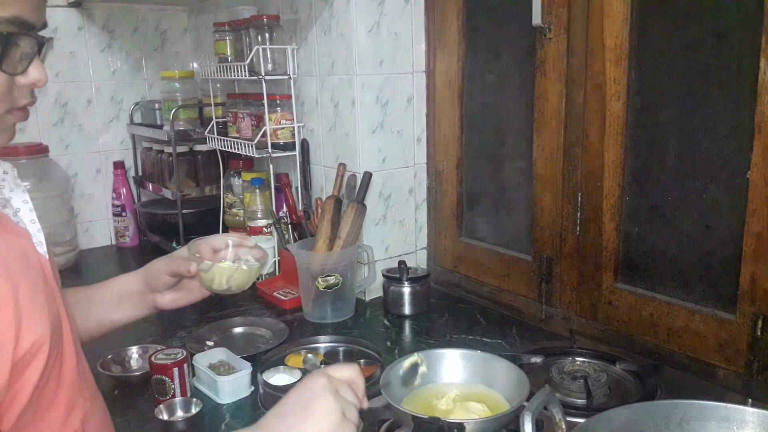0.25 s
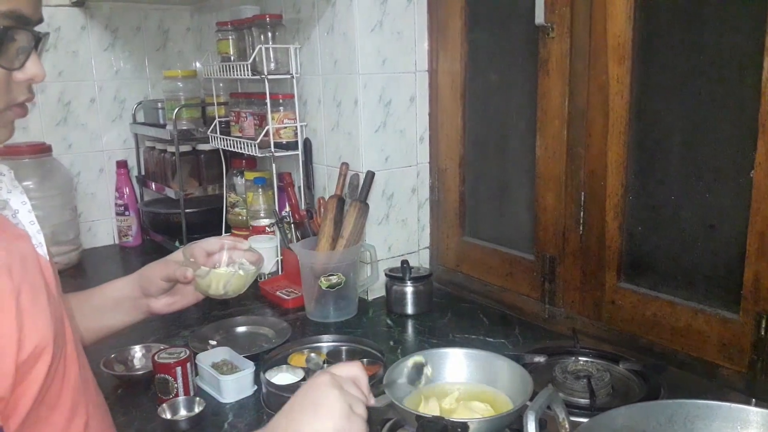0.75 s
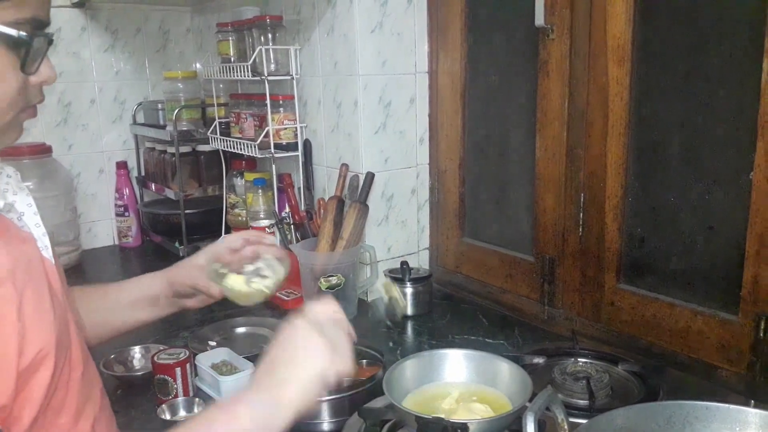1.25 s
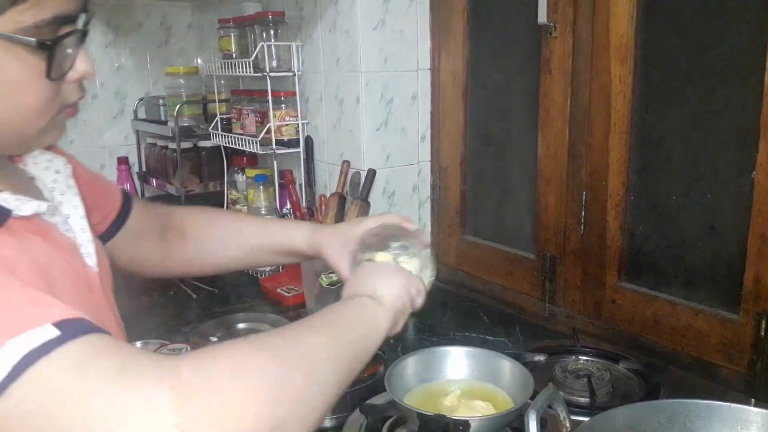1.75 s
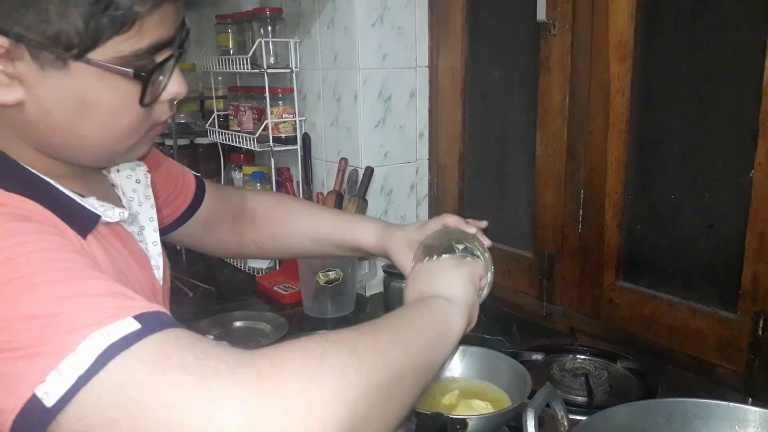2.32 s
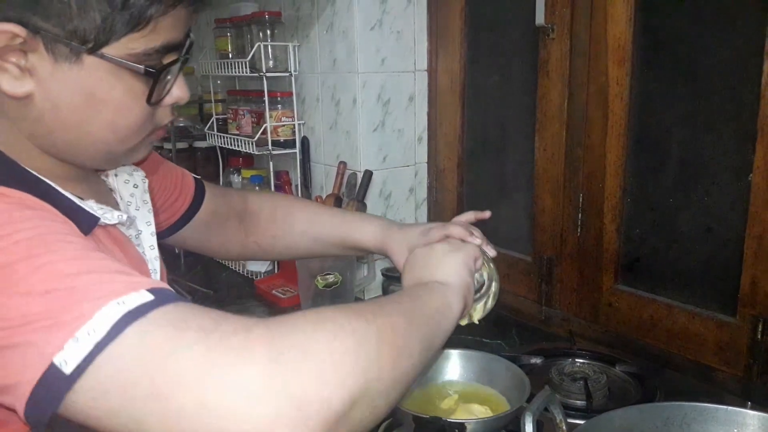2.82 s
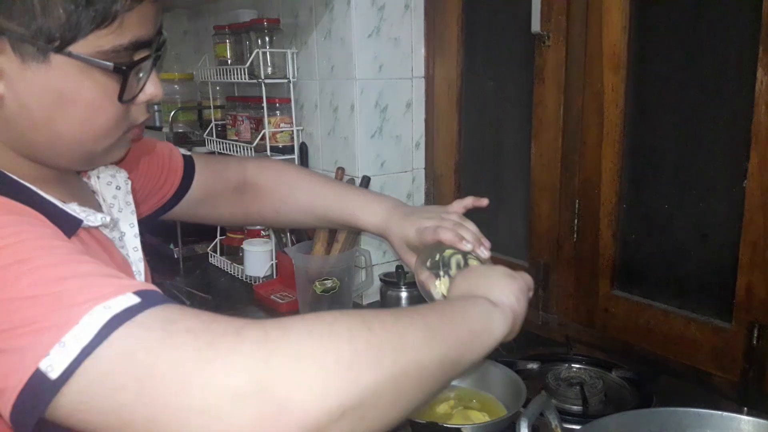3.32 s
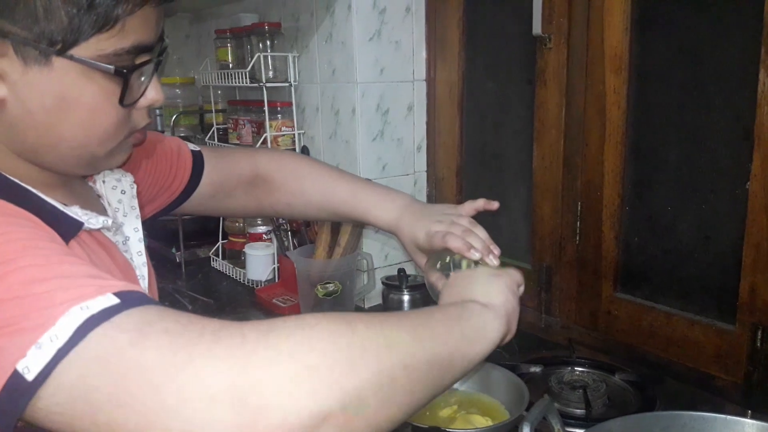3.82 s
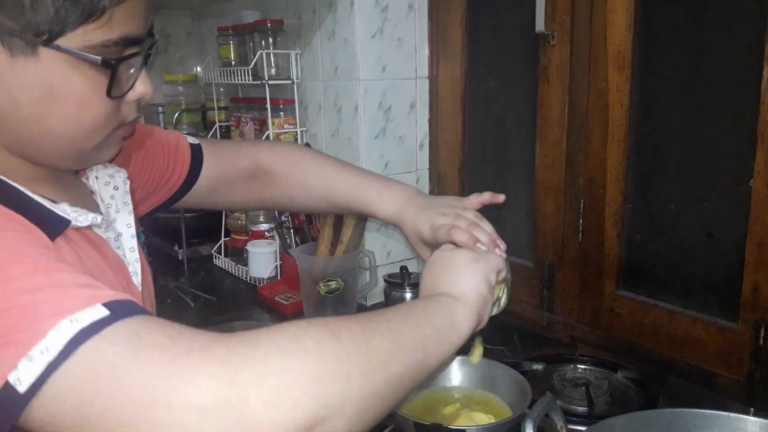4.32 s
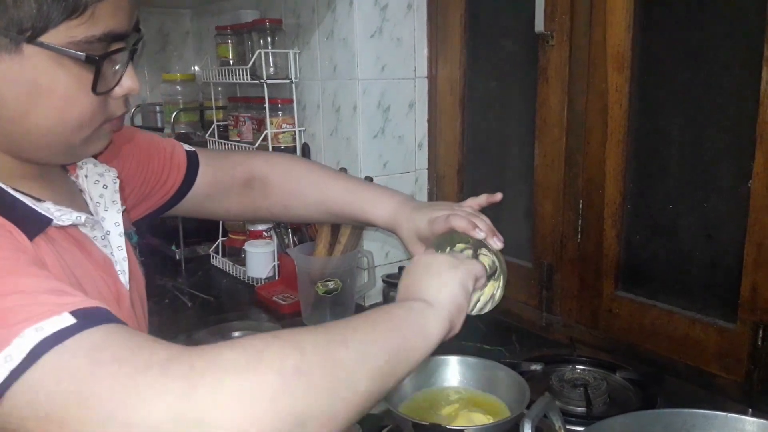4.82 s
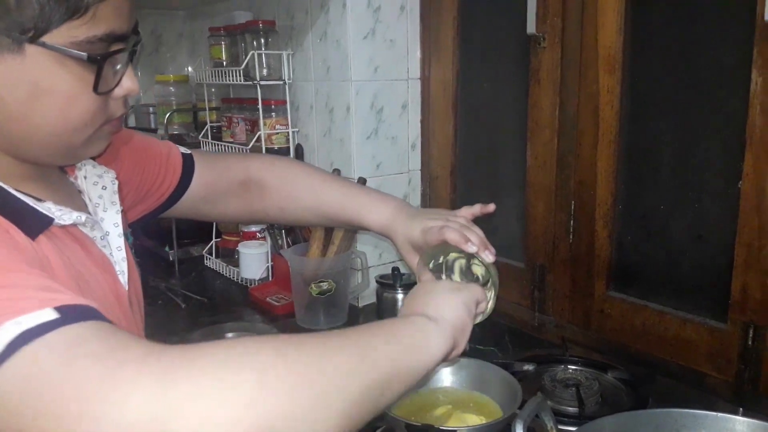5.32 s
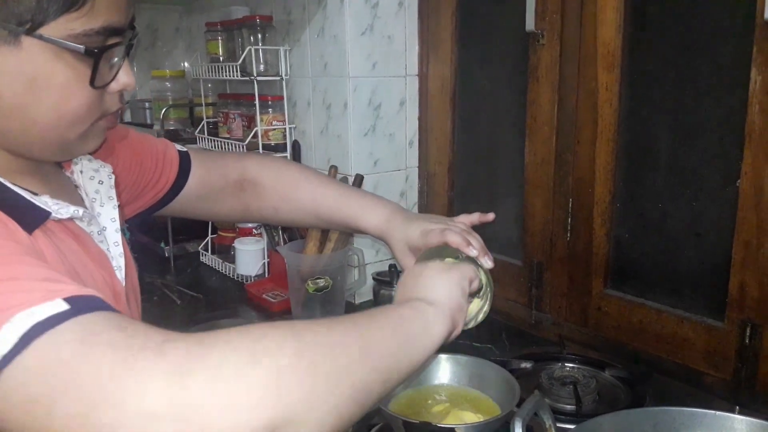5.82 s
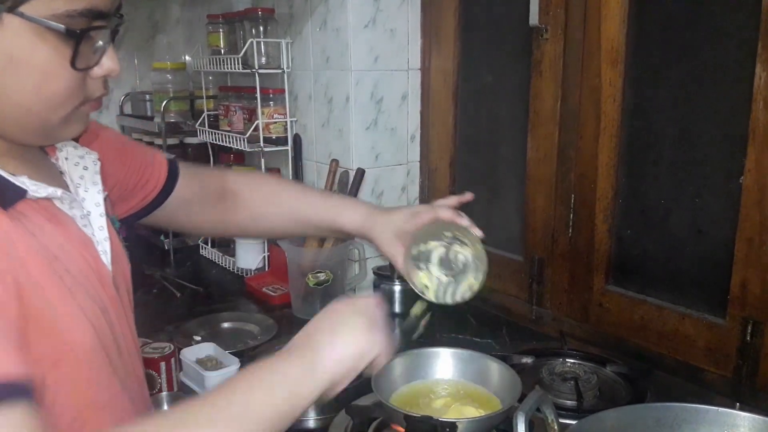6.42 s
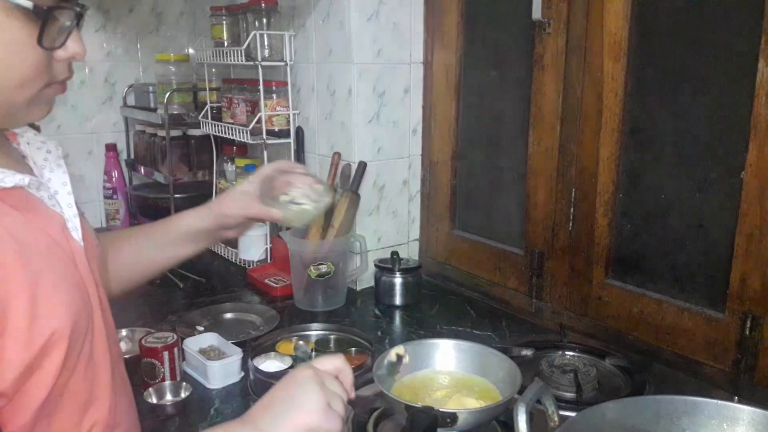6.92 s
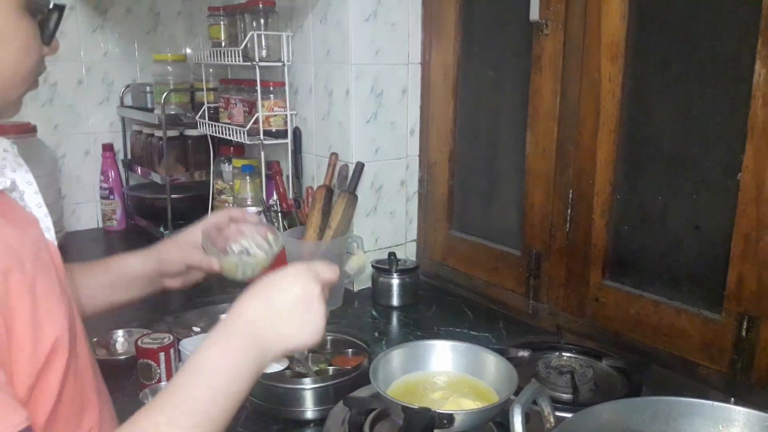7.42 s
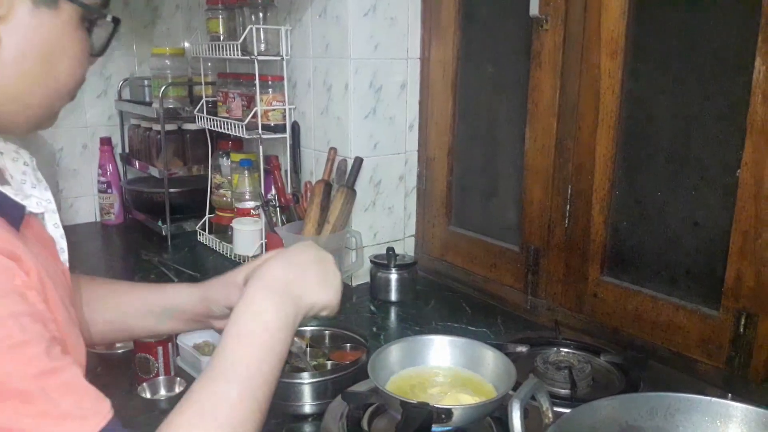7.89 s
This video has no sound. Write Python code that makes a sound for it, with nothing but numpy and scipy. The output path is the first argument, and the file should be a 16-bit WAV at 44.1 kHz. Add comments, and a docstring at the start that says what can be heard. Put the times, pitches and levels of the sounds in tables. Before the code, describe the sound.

Hot butter hisses and spits over a softly rumbling burner, as a spoon knocks on the pan and clacks against a glass bowl.

```python
"""Butter sizzles in a metal pan over a rumbling gas flame, in a small tiled kitchen.
Steam bubbles burst in the hot fat; larger water drops spit. A spoon raps the pan's rim, ringing
wall and bottom, clacks and clinks in a glass bowl as it scoops more butter, then raps the pan again.
A nearby phone hears it in mono; its limiter ducks the frying under the sharpest blows."""
import sys
import numpy as np
from scipy import signal
from scipy.fft import rfft, irfft
from scipy.io import wavfile
from scipy.ndimage import uniform_filter1d, minimum_filter1d

SR = 44100
rng = np.random.default_rng(int(sys.argv[2]) if len(sys.argv) > 2 else 0)


def transcribe(signal):
    """Save signal, clipped to [-1, 1], as a 16-bit WAV file at the path in sys.argv[1]."""
    frames = np.atleast_2d(signal).T
    limited = np.clip(frames, -1, 1)
    pcm = np.round(limited * 32767).astype(np.int16)
    wavfile.write(sys.argv[1], SR, pcm)


N = 359415
TIME_S = np.arange(N) / SR
AGE_S = np.arange(int(0.6 * SR)) / SR  # time since a contact

# spectrum of bubbles bursting in fat: f/Hz, level/dB
SIZZLE_SPECTRUM = [(500, -33.5), (1300, -24.5), (1850, -17.5), (2300, -13), (2750, -15), (3300, -5),
                   (3850, -5.5), (4300, 1), (5100, 2), (5400, -3.5), (5700, -3), (7000, -18.5),
                   (8300, -27.5), (11000, -22)]
# spectrum of the finest foam: f/Hz, level/dB
FIZZ_SPECTRUM = [(6000, -61), (8500, -29.5), (9600, -11), (10600, -2), (11700, 0.5), (12700, 0),
                 (14000, 2.5), (15500, 2)]


def undb(db):
    """Decibels to gain."""
    return 10 ** (np.asarray(db) / 20)


def unit(x):
    """Scale to rms 1."""
    return x / np.sqrt(np.mean(x ** 2) + 1e-18)


def add(out, t_s, sound):
    """Mix a sound in at t_s."""
    i = max(int(t_s * SR), 0)
    out[i:i + len(sound)] += sound[:max(N - i, 0)]


def wander(rate_hz):
    """Smooth random drift, rms 1."""
    hold = max(int(SR / rate_hz), 1)
    steps = np.repeat(rng.standard_normal(N // hold + 1), hold)
    return unit(uniform_filter1d(steps, hold)[:N])


def burst(t60_s):
    """Exponentially decaying noise."""
    return rng.standard_normal(len(AGE_S)) * np.exp(-np.log(1000) * AGE_S / t60_s)


def colour(x, spectrum, size=4096):
    """Minimum-phase filter through (f/Hz, level/dB) points."""
    hz, db = np.transpose(spectrum)
    bins_hz = np.maximum(np.fft.rfftfreq(size, 1 / SR), 1)
    gain = undb(np.interp(np.log(bins_hz), np.log(hz), db))
    cepstrum = irfft(np.log(gain))
    cepstrum[1:size // 2] *= 2
    cepstrum[size // 2 + 1:] = 0
    return signal.fftconvolve(x, irfft(np.exp(rfft(cepstrum))))[:len(x)]


def resonate(x, hz, width_hz):
    """One damped resonance."""
    return signal.lfilter(*signal.iirpeak(hz, hz / width_hz, fs=SR), x)


def kitchen(x, wet_db, t60_s=0.39, build_s=0.0021):
    """Direct sound plus dense echoes off the tiles, different for each spot."""
    tail = burst(t60_s) * (1 - np.exp(-AGE_S / build_s))
    response = undb(wet_db) * tail / np.linalg.norm(tail)
    response[0] += 1
    return signal.fftconvolve(x, response)[:len(x)]


def in_room(x, rms_db, wet_db):
    """One part of a blow with its echoes, set to rms_db over the first 60 ms."""
    y = kitchen(x, wet_db)
    return y * undb(rms_db) / np.sqrt(np.mean(y[:int(0.06 * SR)] ** 2))


def ring(modes, drive_db, chatter_t60_s, wet_db):
    """Contact chatter excites each mode; ringing and echoes blur together."""
    hz, width_hz, mode_db = np.transpose(modes)
    chatter = burst(chatter_t60_s)
    return sum(in_room(resonate(resonate(chatter, f, width), f, 3 * width), db, wet_db)
               for f, width, db in zip(hz, width_hz, drive_db + mode_db))


def stove_db():
    """Reference level for fat and flame, per sample."""
    # stove loudness: t/s, level/dB
    levels = [(0.0, -20), (0.61, -20.5), (1.16, -21), (2.06, -21.5), (2.5, -20.5), (2.61, -22), (3.29, -26),
              (3.52, -24.5), (4.22, -22.5), (4.88, -23), (4.99, -26), (5.31, -27), (5.7, -28), (6.6, -27.5),
              (7.15, -22.5), (8.15, -21.5)]
    return np.interp(TIME_S, *np.transpose(levels))


def bubble_pops(per_s, spread_db):
    """Steam bubbles burst at random: many small, a few large."""
    happens = rng.random(N) < per_s / SR
    size = undb(spread_db * np.minimum(rng.exponential(size=N), 4.8))
    return unit(happens * size * rng.choice([-1, 1], N))


def boil_off(x, offset_db, db_per_s):
    """One band of the frying follows the stove's level and drifts as the butter's water boils off."""
    return unit(x) * undb(stove_db() + offset_db + db_per_s * TIME_S)


def frying(split_hz=4450):
    """Bubbles surge in the fat: the same pops crackle low and sizzle high, and the finest foam fizzes."""
    bubbles = bubble_pops(per_s=4200, spread_db=2.0)
    foam = bubble_pops(per_s=15000, spread_db=3.5)
    surge_db = 0.85 * wander(rate_hz=26)
    fat = kitchen(colour(bubbles, SIZZLE_SPECTRUM), wet_db=-8.5)
    crackle = signal.sosfiltfilt(signal.butter(6, split_hz, fs=SR, output="sos"), fat)
    sizzle = fat - crackle
    fizz = colour(foam + undb(-5) * bubbles, FIZZ_SPECTRUM)
    return undb(surge_db) * (boil_off(crackle, offset_db=-7, db_per_s=-0.27)
                             + boil_off(sizzle, offset_db=-4.5, db_per_s=0.083)
                             + boil_off(fizz, offset_db=-2.27, db_per_s=-0.14))


def flame(offset_db=-25.5, flutter_db=0.8):
    """The gas burner's soft, fluttering rumble."""
    # burner spectrum: f/Hz, level/dB
    spectrum = [(25, -33), (48, -53), (62, -9), (84, -7), (100, -13), (125, -3), (160, -0.5), (210, 0),
                (310, -5.5), (450, -5.5), (650, -13.5), (1200, -10.5), (3000, -32)]
    rumble = unit(colour(rng.standard_normal(N), spectrum))
    return rumble * undb(stove_db() + offset_db + flutter_db * wander(rate_hz=8.1))


def spits():
    """Larger water drops burst in the fat and crack through the sizzle."""
    # bursting drops: t/s, peak before echoes/dB
    drops = [(.089, -6), (1.939, -6.5), (2.153, -6), (2.951, -8), (4.212, -3.5), (4.832, -6), (5.856, -17),
             (6.856, -8), (7.084, -7), (7.22, -4)]
    out = np.zeros(N)
    for t_s, peak_db in drops:
        pop = burst(t60_s=0.0061)
        crack = unit(colour(pop, SIZZLE_SPECTRUM)) + undb(-5.5) * unit(colour(pop, FIZZ_SPECTRUM))
        add(out, t_s, kitchen(crack / np.abs(crack).max(), wet_db=-4) * undb(peak_db))
    return out


def spoon_on_pan(rock_s=0.042, rock_rap_db=-7.5, rock_rim_db=-3):
    """A rap rings rim and fat-damped bottom; the pan rocks back on its support with a softer blow."""
    # blows on the rim: t/s, rap/dB, bottom/dB, rim/dB
    hits = [(0.115, -32, -42, -58), (0.351, -17, -25.5, -41), (0.526, -19, -26.5, -41.5),
            (0.699, -18, -31, -41), (0.875, -18.5, -34.5, -45), (1.047, -17, -31, -40),
            (6.661, -27.5, -41, -46), (6.88, -30, -46, -48), (7.01, -17, -28, -37), (7.545, -37, -55, -62)]
    # spectrum of a rap: f/Hz, level/dB
    rap_spectrum = [(40, -49), (110, -34), (200, -8), (340, -13), (450, -7), (700, -11), (1250, -11.5),
                    (1600, -10), (2150, -6), (2650, -6.5), (3300, -1), (4550, 5), (5400, -2.5), (7500, -20),
                    (10000, -33)]
    # pan bottom modes: f/Hz, width/Hz, level/dB
    bottom_modes = [(217, 18, -24), (286, 9.8, -22), (408, 22, -18), (519, 19.4, -3.5), (736, 89, -17),
                    (815, 31, -26)]
    # pan rim modes: f/Hz, width/Hz, level/dB
    rim_modes = [(1072, 16, -6), (1248, 18, -6), (1818, 44, 6), (2120, 62, 5.5), (2950, 120, 1),
                 (3600, 50, -34)]
    out = np.zeros(N)
    for t_s, rap_db, bottom_db, rim_db in hits:
        rebound_s = t_s + rock_s * rng.uniform(0.7, 1.15)
        rap = colour(burst(t60_s=0.043), rap_spectrum)
        add(out, t_s, in_room(rap, rap_db, wet_db=2))
        add(out, t_s, ring(bottom_modes, bottom_db, chatter_t60_s=0.043, wet_db=-4))
        add(out, t_s, ring(rim_modes, rim_db, chatter_t60_s=0.072, wet_db=1))
        rebound = colour(burst(t60_s=0.095), rap_spectrum)
        add(out, rebound_s, in_room(rebound, rap_db + rock_rap_db, wet_db=4))
        add(out, rebound_s, ring(rim_modes, rim_db + rock_rim_db, chatter_t60_s=0.033, wet_db=-3.5))
    return out


def spoon_on_bowl(nominal_ring_hz=5570, overtones_above_hz=7000, edge_share=0.19):
    """The spoon clacks on hand-held glass, which knocks hollowly and rings when struck cleanly."""
    # blows on the bowl: t/s, clack/dB, knock/dB, knock/Hz, ring/dB, ring/Hz, edge tick/dB
    hits = [(1.646, -19.5, -31, 1640, -24.5, 5500, -29), (1.729, -28, -29, 1470, -27, 5180, -38),
            (2.138, -29, -32, 1450, -44, 5700, -35), (2.186, -22, -30, 1590, -40, 5500, -45),
            (2.517, -29, -32, 1510, -33, 5440, -27.5), (2.568, -10.5, -26.5, 1640, -27, 5360, -45),
            (2.857, -36, -39, 1510, -43, 5670, -31.5), (2.904, -15.5, -30, 1580, -48, 5460, -33),
            (3.254, -19.5, -38, 1590, -37, 5540, -34), (3.605, -27, -32, 1670, -25, 5590, -33),
            (3.957, -38, -29.5, 1850, -20, 5630, -24.5), (4.347, -27, -39, 1510, -42, 5460, -24.5),
            (4.444, -14.5, -32.5, 1700, -44, 5540, -29), (4.897, -9, -27, 1760, -10.5, 5560, -26),
            (5.175, -30, -37.5, 1520, -39, 5660, -23.5), (5.236, -21, -35.5, 1470, -35, 5680, -33),
            (5.566, -18, -37, 1710, -16, 5703, -19.5), (5.944, -32.5, -40.5, 1480, -39, 5400, -32),
            (5.998, -21, -33.5, 1700, -33, 5510, -30.5), (6.122, -32, -41, 1700, -36, 5740, -40),
            (7.797, -23, -25, 1520, -29, 5570, -27), (8.12, -27, -45, 1890, -27.5, 5620, -29)]
    # glass bowl modes: f/Hz, width/Hz, level/dB
    glass_modes = [(1683, 84, -17), (3433, 67, -8.5), (4340, 360, -8.5), (5240, 190, -7.5), (5577, 76, 2.5),
                   (5855, 400, -7), (8030, 160, -12.5), (11200, 350, -4)]
    # spectrum of a clack: f/Hz, level/dB
    clack_spectrum = [(60, -34), (550, -25), (800, -22), (1700, -15), (2700, -15), (3280, -2), (3600, 0),
                      (3850, 1.5), (4300, -1), (4900, 2.5), (5700, -4), (7000, -21), (8800, -36.5),
                      (15000, -10)]
    # spectrum of an edge tick: f/Hz, level/dB
    tick_spectrum = [(7000, -50), (9300, -12), (10600, 5), (11600, 13), (12600, 1), (14000, -6),
                     (15300, -5)]
    out = np.zeros(N)
    for t_s, clack_db, knock_db, knock_hz, ring_db, ring_hz, tick_db in hits:
        knock = resonate(burst(t60_s=0.035), knock_hz, width_hz=380)
        knock = resonate(knock, knock_hz, width_hz=1340)
        # grip and contact point shift the ring; a sharp edge brings out the high overtones
        modes = np.array(glass_modes) * [ring_hz / nominal_ring_hz, 1, 1]
        overtone_db = ring_db + edge_share * (tick_db - ring_db) - 6.5
        drive_db = np.where(modes[:, 0] > overtones_above_hz, overtone_db, ring_db)
        add(out, t_s, in_room(colour(burst(t60_s=0.03), clack_spectrum), clack_db, wet_db=-2.5))
        add(out, t_s, in_room(knock, knock_db, wet_db=2))
        add(out, t_s, in_room(colour(burst(t60_s=0.054), tick_spectrum), tick_db, wet_db=-6.5))
        add(out, t_s, ring(modes, drive_db, chatter_t60_s=0.042, wet_db=-6))
    return out


def scene():
    """Stove and spoon, the same in both channels."""
    mono = frying() + spits() + flame() + spoon_on_bowl() + spoon_on_pan()
    return np.array([mono, mono])


def record(dry):
    """A look-ahead limiter ducks around peaks; clipping and a low-pass follow."""
    ceiling, ahead_s, release_s, top_hz = 1.25, 0.012, 0.045, 15800
    needed_gain = np.minimum(1, ceiling / (np.abs(dry).max(axis=0) + 1e-9))
    ahead = int(ahead_s * SR)
    cut = 1 - uniform_filter1d(minimum_filter1d(needed_gain, 2 * ahead + 1), ahead)
    pole = np.exp(-1 / (release_s * SR))
    gain = 1 - np.maximum(cut, signal.lfilter([1 - pole], [1, -pole], cut))
    low_pass = signal.ellip(12, 0.2, 70, top_hz, fs=SR, output="sos")
    return signal.sosfilt(low_pass, np.clip(dry * gain, -0.95, 0.95))


dry = scene()
out = record(dry)
transcribe(out)
```